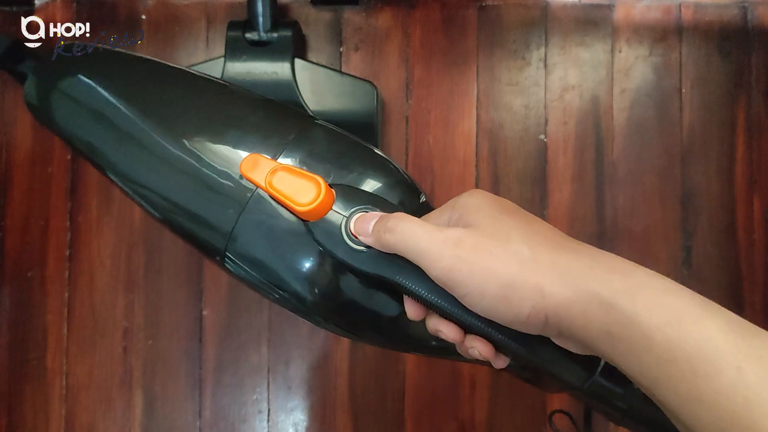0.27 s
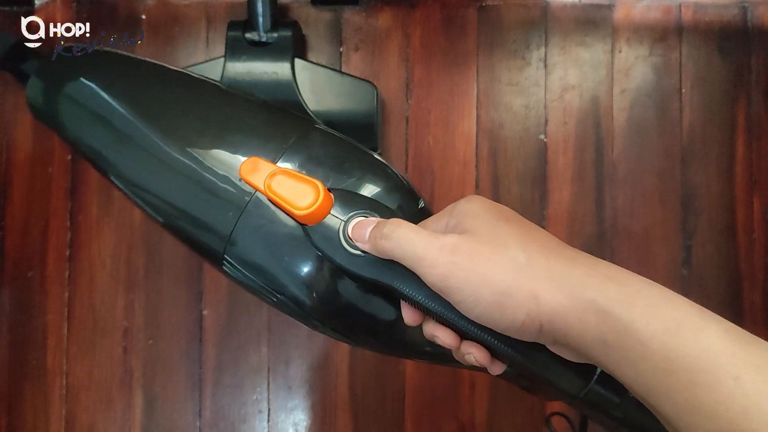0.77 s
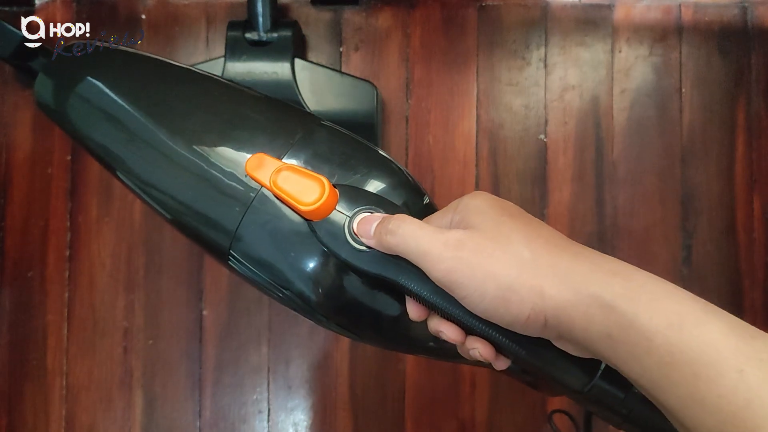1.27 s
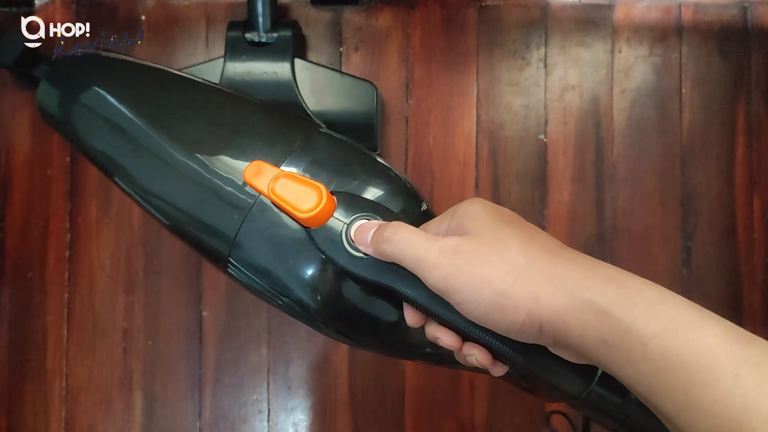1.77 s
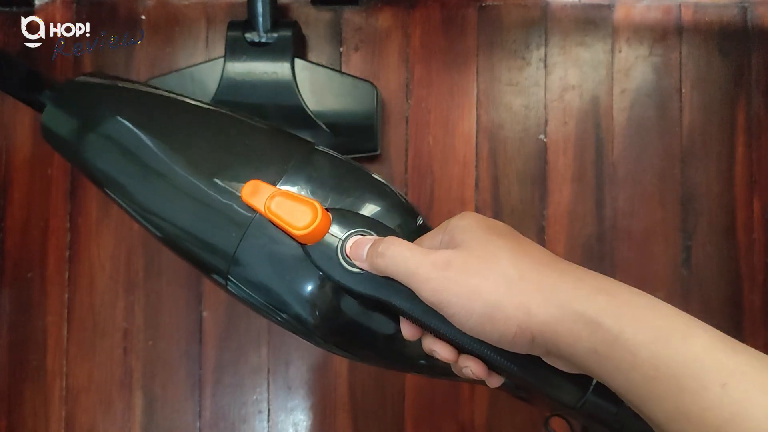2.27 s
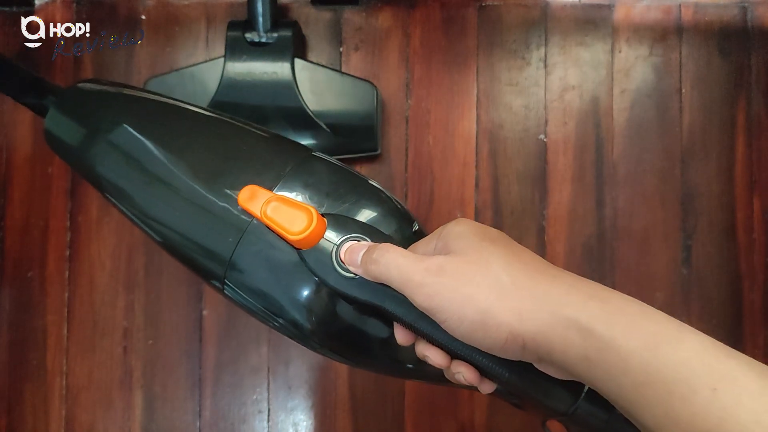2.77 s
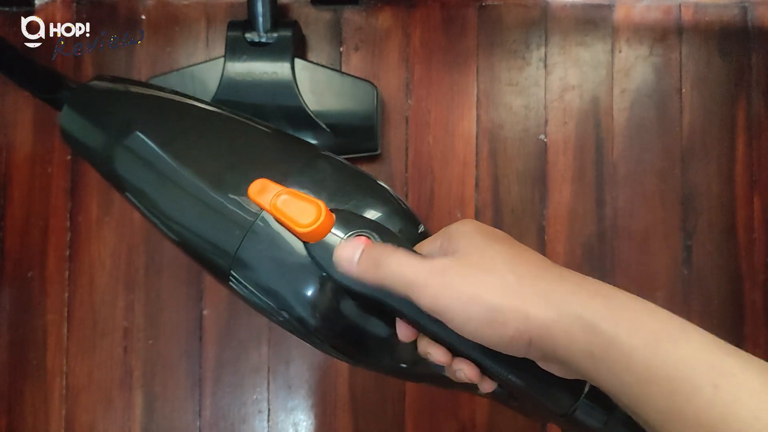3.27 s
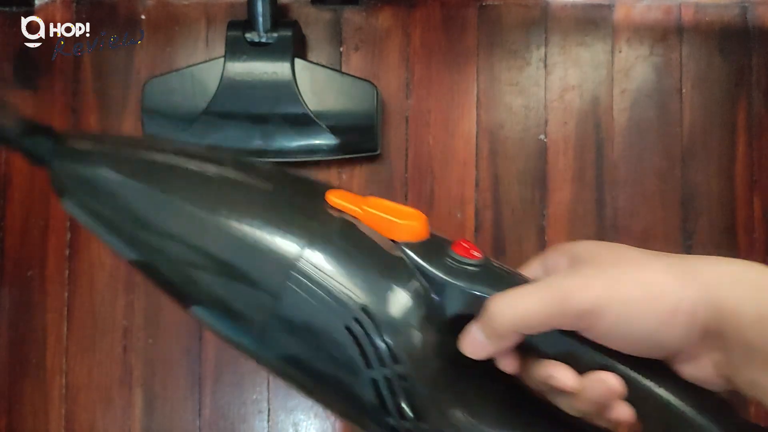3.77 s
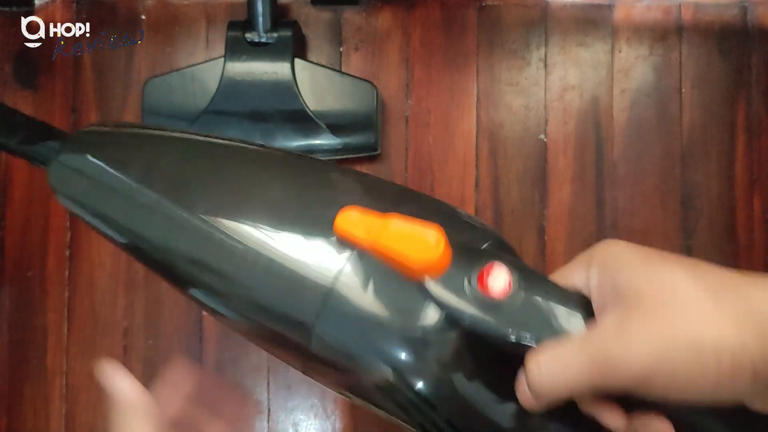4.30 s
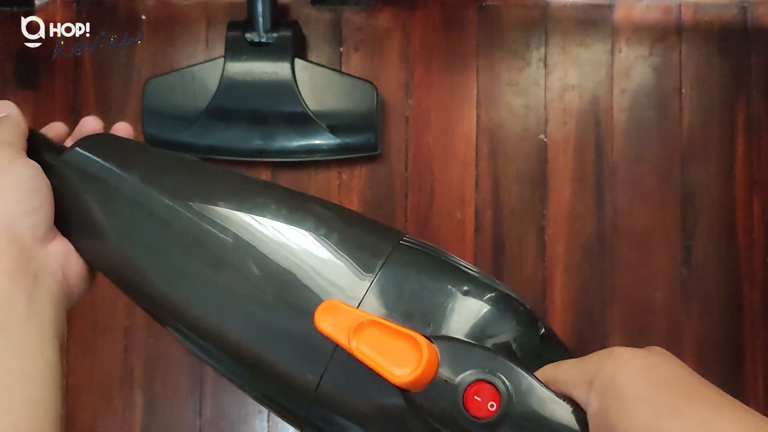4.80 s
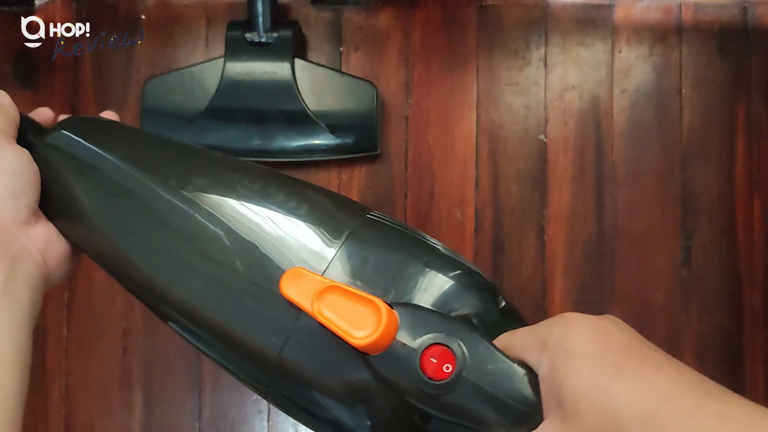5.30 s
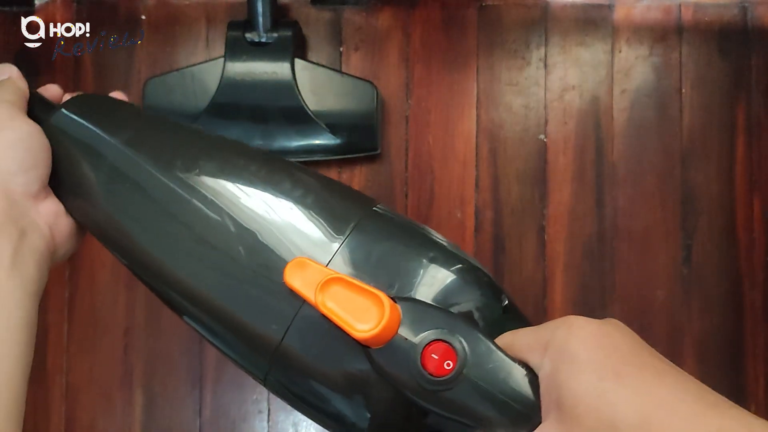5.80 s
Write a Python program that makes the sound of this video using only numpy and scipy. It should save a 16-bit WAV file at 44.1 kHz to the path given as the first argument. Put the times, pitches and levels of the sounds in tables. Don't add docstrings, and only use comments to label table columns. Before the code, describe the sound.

Close, loud rush of air and high motor whine from a little vacuum, cut at about three seconds, gliding down and fading to a faint hiss.

```python
import sys
import numpy as np
from scipy import signal
from scipy.fft import rfft, irfft
from scipy.io import wavfile
from scipy.ndimage import uniform_filter1d, minimum_filter1d

SR = 44100
rng = np.random.default_rng(int(sys.argv[2]) if len(sys.argv) > 2 else 0)


def output_pcm(signal):
    pcm = np.clip(np.atleast_2d(signal).T, -1, 1) * 32767
    wavfile.write(sys.argv[1], SR, np.round(pcm).astype(np.int16))


def voltage_ratio(level):
    return 10 ** (np.asarray(level, float) / 20)


N = 266760

OFF_S = 2.92
TOP_HZ, SETTLE_S = 729.02, 0.2642

WHINE_MULTIPLES = [1, 2, 7, 12]
# start_s, tilt [0 level, 1 tilted]
WRIST_TILT = [
    (0, 0),
    (.9, 0.049),
    (1.3, 0),
    (1.7, 0.073),
    (2.2, 0.21),
    (2.65, 1),
    (2.92, 0.59),
]


def evened(x):
    return x / np.sqrt(np.mean(x ** 2) + 1e-20)


def read(points, hz):
    f, value = np.transpose(points)
    return np.interp(np.log(hz + 1), np.log(f + 1), value)


def follow(rows, t):
    s, *columns = np.transpose(rows)
    return np.array([np.interp(t, s, c) for c in columns])


def bumps(modes, hz):
    return [(db, 1 / (1 + ((hz - f) / (width / 2)) ** 2)) for f, width, db in modes]


def drift(rate_hz):
    steps = rng.standard_normal(1200)
    low_pass = signal.butter(2, np.clip(rate_hz, 1, 80), fs=200, output="sos")
    smooth = signal.sosfiltfilt(low_pass, steps)
    return np.interp(np.arange(N) / SR, np.arange(1200) * N / SR / 1199, evened(smooth))


def blotches(shape, bins, frames):
    grain = rng.standard_normal(shape[::-1]).T
    across_pitch = uniform_filter1d(grain, round(bins), 0)
    return evened(uniform_filter1d(across_pitch, round(frames), 1))


def shaped_noise(field_db):
    a, b = rng.standard_normal(field_db.shape[::-1] + (2,)).T
    spectra = (a + 1j * b) * voltage_ratio(field_db) * np.sqrt(1.5 / 1024)
    return signal.istft(spectra, nperseg=1024, noverlap=768)[1][:N]


def shaft(t):
    short_hz, creep_hz_per_s = 30.63, 1.293
    brush_drag, bearing_drag, fan_drag = 28.15, 0.1078, 7.77e-4
    step_s, coast = 0.005, [TOP_HZ]
    while len(coast) * step_s < N / SR - OFF_S + step_s:
        speed = coast[-1]
        coast.append(speed - step_s * (brush_drag + bearing_drag * speed + fan_drag * speed ** 2))
    driven = TOP_HZ + creep_hz_per_s * (t - OFF_S) - short_hz * np.exp(-t / SETTLE_S)
    return np.where(t < OFF_S, driven, np.interp(t - OFF_S, step_s * np.arange(len(coast)), coast))


def flow(t, share):
    full = [-13.5, -16.5, -18, -31.5]
    fall = [16.3, 6.9, 11.44, 10.1]
    tilted = [-0.6, 1.85, -0.64, -2]
    # roar_db, duct_hiss_db, vent_hiss_db, fizz_db
    by_pose = [
        (0.1, 0.1, -0.013, 0.45),
        (1.8, 1.6, 0.1, 1.5),
        (1.4, 3.3, .3, -1.1),
        (0.1, 0.1, -.1, 0.1),
    ]
    # start_s, share [of 3 dB]
    vents = [
        (3.1, 0),
        (3.5, .7),
        (4.4, 1.2),
        (4.62, 0),
    ]
    speed, slope = shaft(t), np.c_[fall]
    law = slope * np.log2(speed / TOP_HZ)
    law[0] = -10 * np.log10(1 + (358 / speed) ** (slope[0] / (10 * np.log10(2))))
    law[2] += 3 * follow(vents, t)[0]
    wrist = np.c_[tilted] * follow(WRIST_TILT, t) * share[0]
    return law + np.c_[full] + wrist + np.transpose(by_pose) @ share


def rush():
    # pitch_hz, level_db [dB per Hz]
    held, turned = [(150, -46.5), (300, -31.5), (480, -20.5), (600, -7), (930, -4.5), (1060, -22),
                    (1450, -9), (1900, -14.5), (2300, -19), (3000, -25), (5200, -23.5), (8400, -24),
                    (9700, -33.5), (15500, -30.5)], [(150, -41), (285, -34.5), (400, -17.5), (560, -9.5), (800, -3),
                                  (1100, -13.5), (1700, -19), (1950, -24.5), (2300, -22), (2800, -35),
                                  (4500, -29), (5200, -33.5), (8400, -25.5), (9400, -37), (15500, -30)]
    lifted, cradled = [(150, -35.5), (300, -21.5), (420, -7.5), (620, -1), (800, -14), (1040, -13),
                       (1150, -19), (1570, -15), (2000, -20), (2810, -35), (4500, -30), (4950, -35),
                       (8200, -32), (9800, -40.5), (15500, -36.5)], [(150, -34), (300, -22.5), (400, -7.5), (700, -1), (850, -20),
                                       (1150, -14.5), (1550, -15), (1900, -18), (2600, -30.5), (5400, -29),
                                       (6400, -30.5), (8200, -29), (9900, -38), (15500, -32)]
    # pitch_hz, width_hz, boost_db
    held_ducts, turned_ducts = [(818, 200, 4), (1186, 62, 11.5), (1490, 91, 5), (2140, 89, 7.5),
                                (3724, 580, 6), (4560, 230, 5.5), (6540, 620, -3.5), (6900, 190, 2.5),
                                (7760, 240, 3), (12300, 2700, -5), (1389, 30, 3.5)], [(626, 154, 9), (874, 36, -24), (960, 74, 3),
                                                    (1368, 22, 13), (3560, 1300, 11), (7230, 600, 2.5),
                                                    (12100, 4700, -0.5)]
    lifted_ducts, cradled_ducts = [(672, 115, 10.3), (960, 49, 13.6), (1620, 89, 3.8), (2380, 36, 3.6),
                                   (3180, 170, 9.6), (3770, 100, 3.4), (4110, 100, 3), (4670, 170, 2.8),
                                   (5400, 77, 3), (5900, 300, 2.6), (7300, 240, 5)], [(670, 150, 1.5), (970, 106, 13.5),
                                                         (1520, 170, 3.7), (2220, 58, 10.5),
                                                         (2660, 63, 2.6), (3170, 170, 8), (3800, 180, 4.4),
                                                         (4780, 91, 6.7), (5330, 130, 9.9),
                                                         (7150, 310, 6.1), (14700, 400, 3)]
    # start_s, pose [0 held, 1 turned, 2 lifted, 3 cradled]
    hand = [
        (0, 0),
        (3.1, 0.12),
        (3.55, .4),
        (3.75, 1),
        (4.25, 1.55),
        (4.5, 1.6),
        (5.0, 2.5),
        (5.2, 2.95),
        (6.05, 2.99),
    ]
    band_hz = [800, 1600, 4500, 12000]
    # low_hz, high_hz
    band_edges = [
        (450, 1050),
        (1050, 2500),
        (2500, 9000),
        (9200, 15500),
    ]
    trim = [0.77, 0.035, -0.39, -0.13]
    # time_s, length_s, level_db
    dips = [
        (3.042, 0.02, -17),
        (3.757, 0.027, -9),
    ]

    hz, t = np.fft.rfftfreq(1024, 1 / SR), np.arange(N // 256 + 5) * 256 / SR
    ways = [(held, held_ducts), (turned, turned_ducts), (lifted, lifted_ducts), (cradled, cradled_ducts)]
    poses = np.array([read(base, hz) + sum(db * bell for db, bell in bumps(ducts, hz)) for base, ducts in ways])
    share = np.clip(1 - abs(follow(hand, t) - np.arange(len(ways))[:, None]), 0, 1)
    share = share / share.sum(0)
    colour = poses.T @ share

    band_db = [10 * np.log10((voltage_ratio(colour[(hz > lo) & (hz < hi)]) ** 2).sum(0)) for lo, hi in band_edges]
    blend = np.array([read(list(zip(band_hz, row)), hz) for row in np.eye(len(band_hz))])
    field = colour + blend.T @ (flow(t, share) + np.c_[trim] - band_db)
    field += 0.59 * blotches(colour.shape, 14, 10)

    speckle = read([(2000, 0.042), (5000, 0.69), (7000, 1.04), (8700, 0.51), (9600, 0.21), (15000, .1)], hz)
    field += 5.0 * speckle[:, None] * (np.minimum(blotches(colour.shape, 9, 2), 1.2) + 0.17)

    flicker_db = (0.59 + 0.91 * shaft(t) / TOP_HZ) * np.interp(t, np.arange(N) / SR, drift(70))
    field += flicker_db * read([(8500, 0.36), (9800, 0.99)], hz)[:, None]

    air = voltage_ratio(-0.93) * np.sqrt(1024) * shaped_noise(field)
    roar = signal.sosfiltfilt(signal.butter(3, 1150, fs=SR, output="sos"), air)
    time_s = np.arange(N) / SR
    stumble_db = sum(db * np.exp(-(2 * (time_s - s) / length) ** 2) for s, length, db in dips)
    return air + roar * (voltage_ratio(stumble_db) - 1)


def whines(t, speed):
    driven_db = [-25, -29.5, -26.5, -33]
    short_db = [2, -1, -1, -18]
    tilt_db = [3, 9.5, 4, -22]
    between_db = [-58, -60, -53, -62]
    # pitch_hz, width_hz, level_db
    unbalance, twice = [(616, 310, -30), (398, 50, -27.5), (365, 35, -29.5), (322, 36, -26.5),
                        (292, 57, -37.5), (247, 42, -43.5), (204, 70, -50.5)], [(1230, 250, -27.5), (747, 44, -20), (650, 55, -36),
                                           (543, 56, -29), (402, 32, -37)]
    blades, bars = [(4930, 420, -25), (4520, 460, -25), (4200, 350, -21.5), (3830, 240, -24.5),
                    (3360, 750, -27.5), (3085, 59, -24.5), (2770, 220, -34), (2165, 220, -29),
                    (2026, 160, -29), (1856, 130, -32), (1707, 180, -23), (1567, 340, -24.5),
                    (1343, 220, -26.5), (1210, 120, -33.5)], [(7600, 350, -31), (7150, 300, -32), (5500, 250, -39), (4640, 350, -41),
                                    (4000, 260, -34), (3390, 260, -42), (3070, 120, -47), (2190, 220, -45)]

    driven = np.c_[driven_db] + np.c_[short_db] * np.exp(-t / SETTLE_S)
    driven = driven + np.c_[tilt_db] * follow(WRIST_TILT, t)
    free = []
    for k, low, modes in zip(WHINE_MULTIPLES, between_db, [unbalance, twice, blades, bars]):
        swells = sum((voltage_ratio(db) * bell ** 2) ** 2 for db, bell in bumps(modes, k * speed))
        free.append(voltage_ratio(low) ** 2 + swells)
    power = np.exp(-np.maximum(t - OFF_S, 0) / 0.084)
    return power * driven + (1 - power) * 10 * np.log10(free)


def motor():
    wobbles = [3, 3, 1.5, 2]
    shake_multiples = [3, 4, 5, 6, 8, 9, 10, 11]
    shake_db = [-26.5, -35.5, -31, -23.5, -27, -24, -38, -42]
    # pitch_hz, width_hz, level_db
    shell = [(527, 120, 1), (686, 67, -1), (945, 110, -0.5), (1563, 180, 0), (2165, 72, -19)]
    # multiple of each; then time_s, length_s, level_db
    whistle_multiples = [14, 14, 14, 14, 14, 21, 18, 48, 36, 72, 71, 72, 72, 72, 72, 84, 84]
    whistles = [(2.41, .04, -46), (2.51, .1, -46), (2.74, .1, -46), (2.88, .08, -44), (3.23, .13, -39),
                (4.3, .2, -50), (4.42, .12, -51), (4.72, .05, -58), (5.3, .4, -64), (5.5, .12, -56),
                (5.49, .09, -56), (5.585, .02, -57), (5.655, .07, -55), (5.725, .05, -56),
                (5.815, .02, -59), (5.87, .05, -65), (6.0, .03, -64)]

    t = np.arange(N) / SR
    speed = shaft(t) * (1 + 0.00052 * drift(15.0))
    angle = 2 * np.pi * np.cumsum(speed) / SR

    def tone(k, db, wobble_db):
        strength = np.sqrt(2) * voltage_ratio(db + wobble_db * drift(18.6))
        return strength * np.sin(k * angle + 2 * np.pi * rng.random())

    out = np.zeros(N)
    for k, db, wobble_db in zip(WHINE_MULTIPLES, whines(t, speed), wobbles):
        out += tone(k, db, np.where(t > OFF_S, 1.1, wobble_db))
    fading_db = 9.5 * np.minimum(np.log2(speed / 350), 0)
    for k, db in zip(shake_multiples, shake_db):
        ringing = sum(voltage_ratio(top) * bell ** 2 for top, bell in bumps(shell, k * speed))
        out += tone(k, db + fading_db, 2.7) * ringing
    fuzz = 1.1 + 0.7 * drift(80)
    for k, (s, length, db) in zip(whistle_multiples, whistles):
        near = abs(t - s) < length
        swell = np.exp(-(2 * (t[near] - s) / length) ** 4)
        out[near] += np.sqrt(2) * voltage_ratio(db) * fuzz[near] * np.sin(k * angle[near]) * swell
    return out


def boards(x):
    # pitch_hz, width_hz, level_db
    echoes = [(229, 18, -1.5), (326.7, 22, 6.5), (349.7, 18.6, -16.5), (373, 13, -1.5), (486.4, 11, 7),
              (500, 26, -15), (1013, 22, -5.5), (1041, 21, 5), (1546, 14, 4.5), (1600, 34, -6.5),
              (1845, 36, -3.5), (2045, 20, -7), (2133, 23, 3.5)]
    hz = np.fft.rfftfreq(N, 1 / SR)
    return irfft(rfft(x) * voltage_ratio(sum(db * bell for db, bell in bumps(echoes, hz))), N)


def room():
    # pitch_hz, level_db [dB per Hz]
    hum = [(20, -26), (60, -9), (110, -9), (170, 0), (260, 7), (500, -40)]
    hz = np.fft.rfftfreq(1024, 1 / SR)
    return voltage_ratio(-53) * evened(shaped_noise(read(hum, hz)[:, None] * np.ones(N // 256 + 5)))


def scene():
    # start_s, level_db
    drive = [
        (0, 0.95),
        (2.9, 0.55),
        (3.6, 2),
        (4.2, 0.86),
        (4.8, 1.17),
        (6.05, 0),
    ]
    loudness = voltage_ratio(follow(drive, np.arange(N) / SR)[0])
    return np.tile(loudness * (boards(rush()) + motor()) + room(), (2, 1))


def top_cut(x):
    return signal.sosfilt(signal.butter(12, 16860, fs=SR, output="sos"), x)


def record(dry):
    limit_db, most_db, recover_db_per_s, edge_hz = -0.1, 3.2, 56, 15510
    low_pass = signal.firwin(1601, edge_hz, window=("kaiser", 10), fs=SR)
    heard = signal.oaconvolve(dry, low_pass[None], "same")
    fall = np.arange(N) * recover_db_per_s / SR
    peak_db = 20 * np.log10(abs(heard[0]) + 1e-9)
    peak_db = np.minimum(peak_db - limit_db, most_db)
    over_db = np.maximum(np.maximum.accumulate(peak_db + fall) - fall, 0)
    over_db = uniform_filter1d(-minimum_filter1d(-over_db, size=61), size=61)
    return top_cut(np.clip(heard / voltage_ratio(over_db), -1, 1))


dry = scene()
out = record(dry)
output_pcm(out)
```